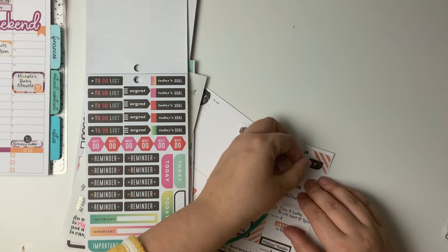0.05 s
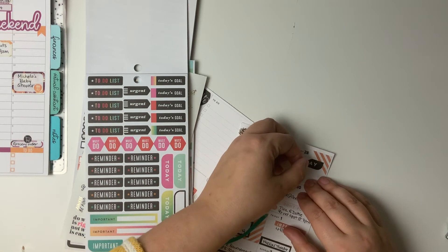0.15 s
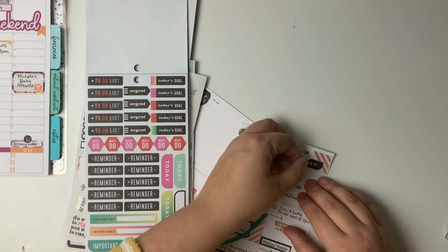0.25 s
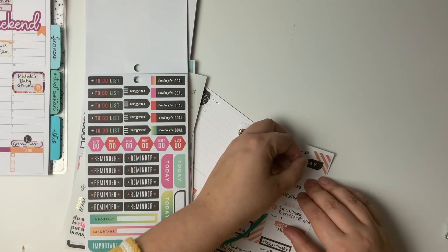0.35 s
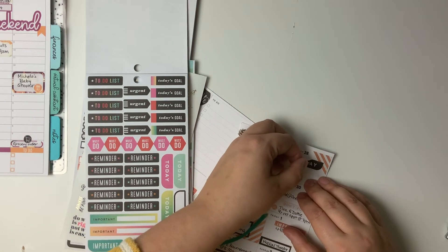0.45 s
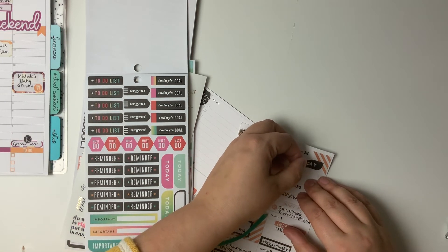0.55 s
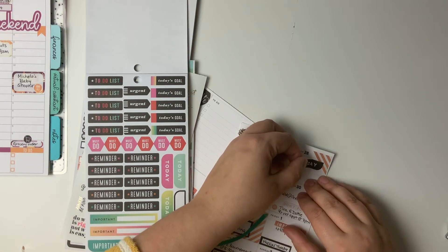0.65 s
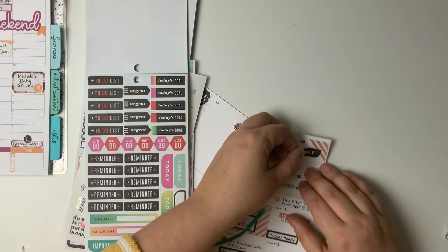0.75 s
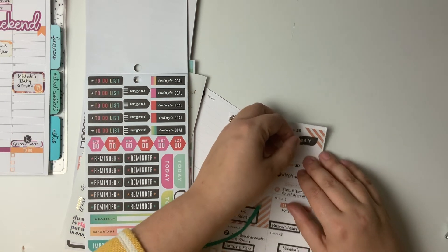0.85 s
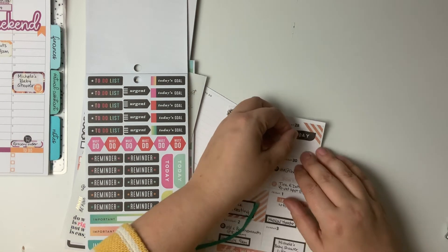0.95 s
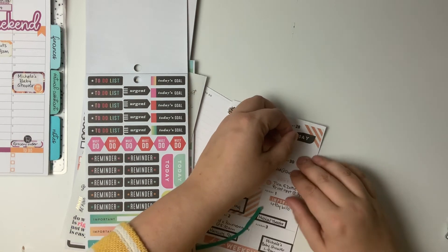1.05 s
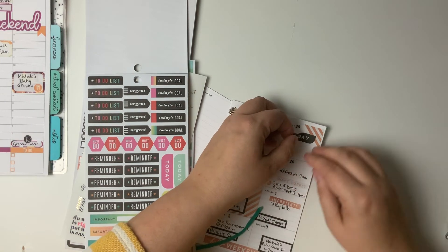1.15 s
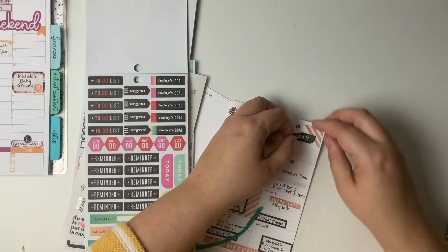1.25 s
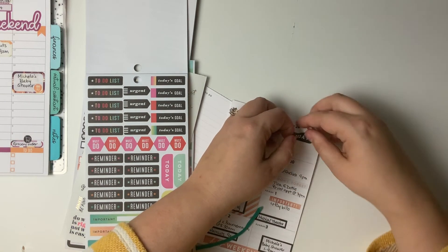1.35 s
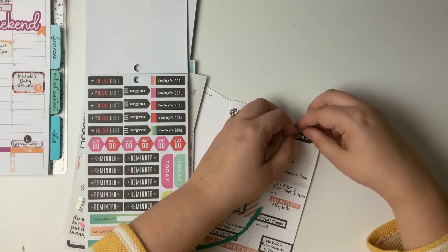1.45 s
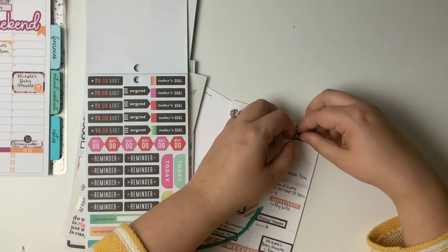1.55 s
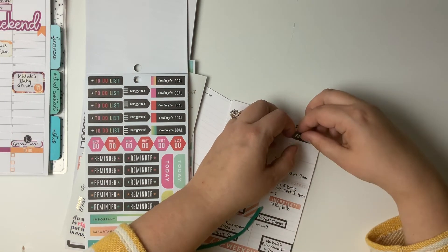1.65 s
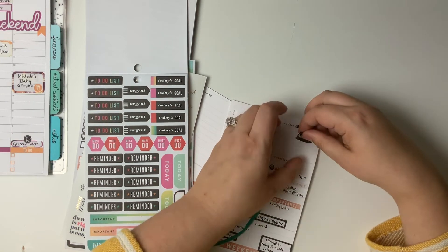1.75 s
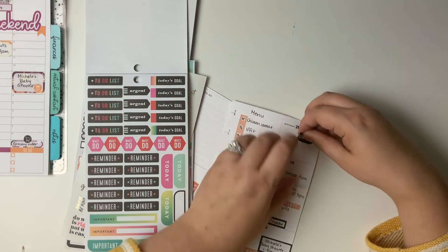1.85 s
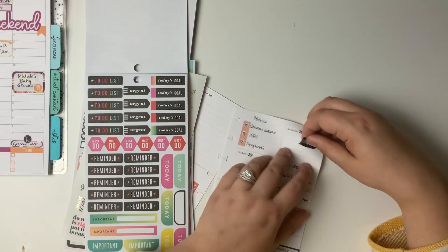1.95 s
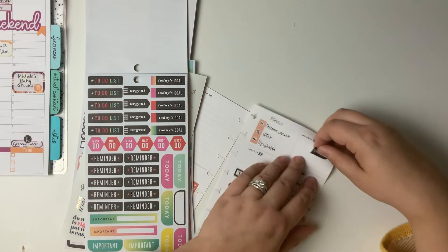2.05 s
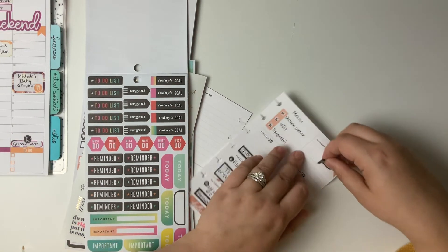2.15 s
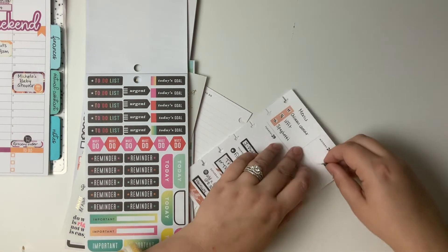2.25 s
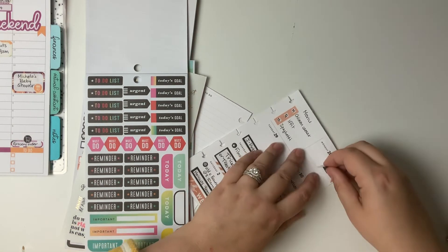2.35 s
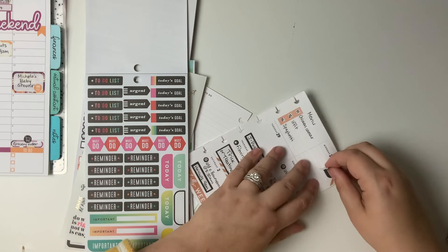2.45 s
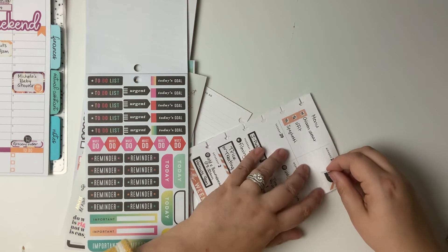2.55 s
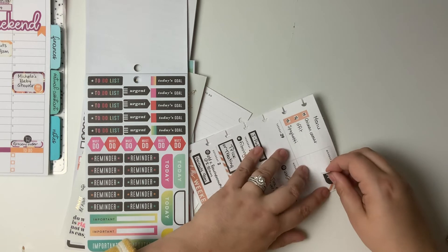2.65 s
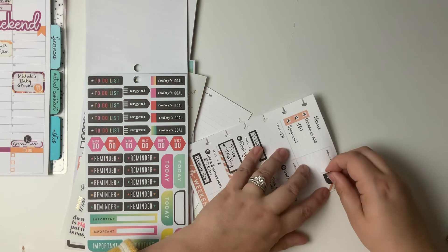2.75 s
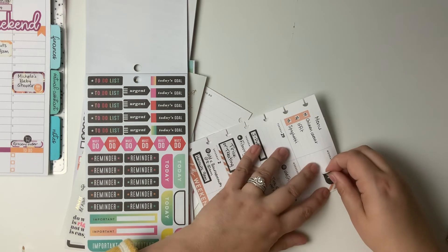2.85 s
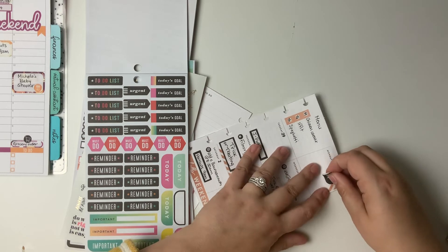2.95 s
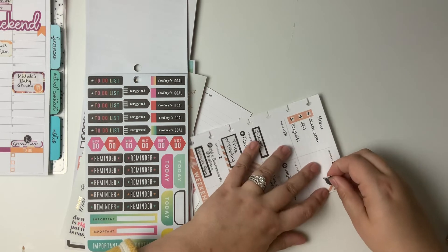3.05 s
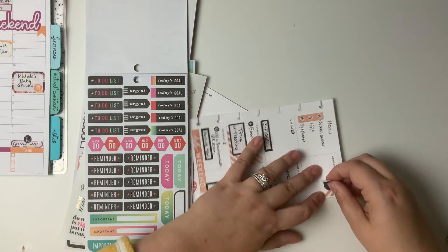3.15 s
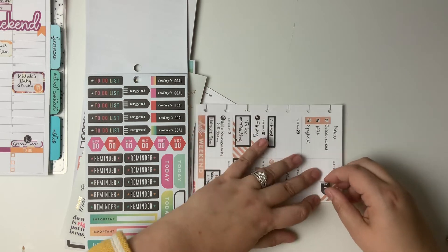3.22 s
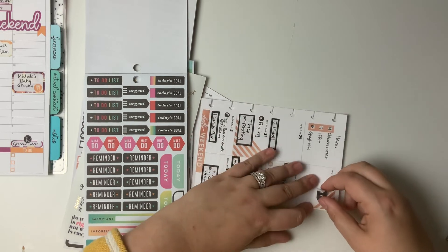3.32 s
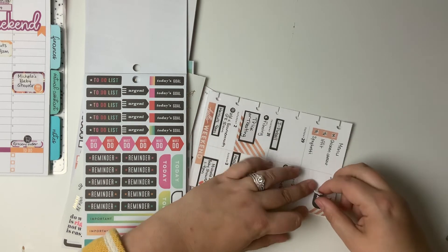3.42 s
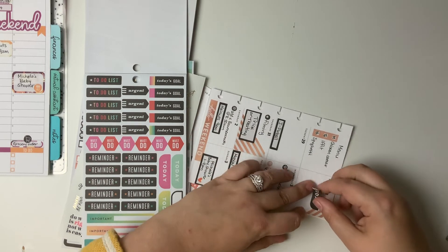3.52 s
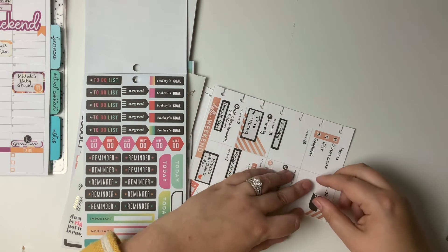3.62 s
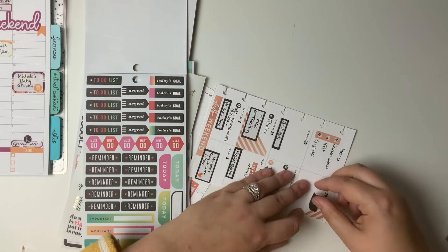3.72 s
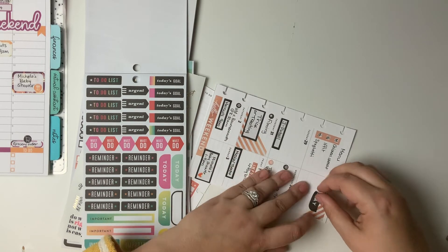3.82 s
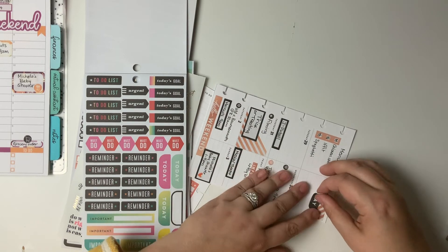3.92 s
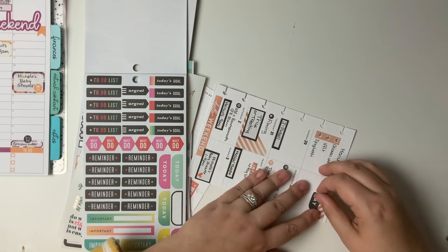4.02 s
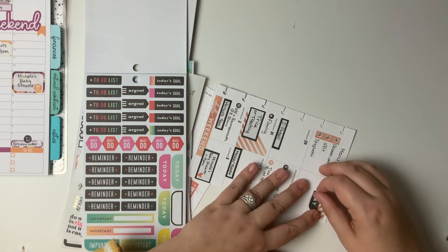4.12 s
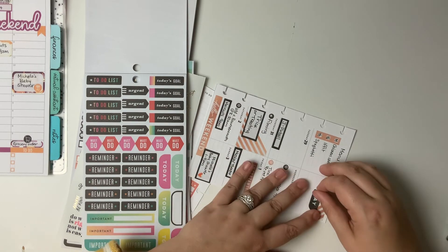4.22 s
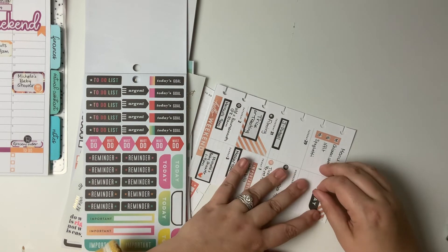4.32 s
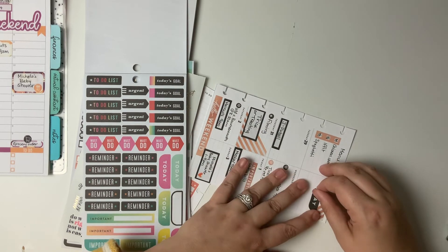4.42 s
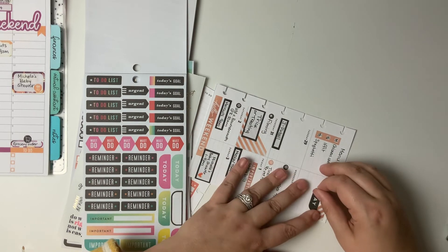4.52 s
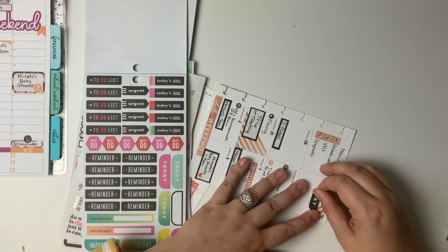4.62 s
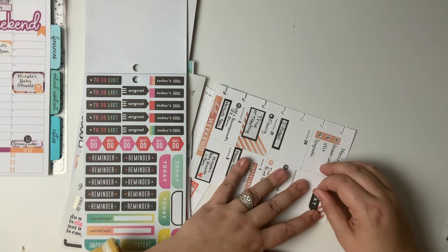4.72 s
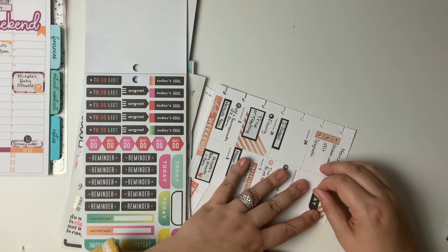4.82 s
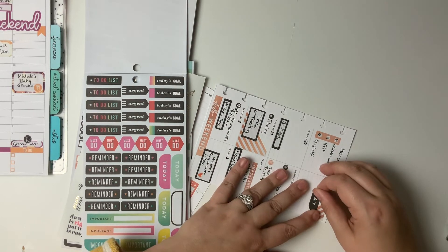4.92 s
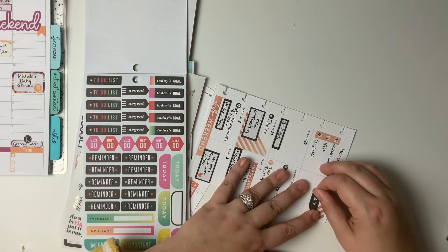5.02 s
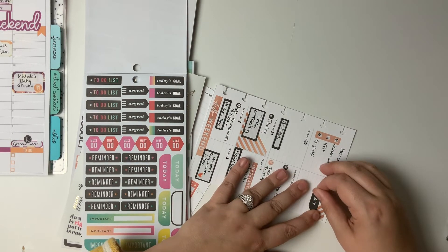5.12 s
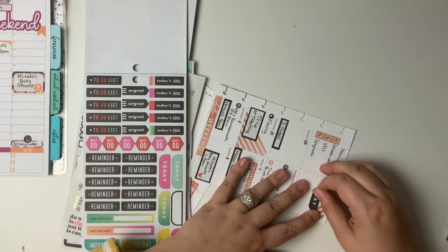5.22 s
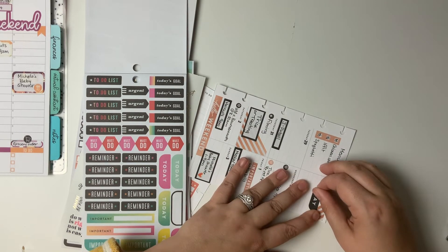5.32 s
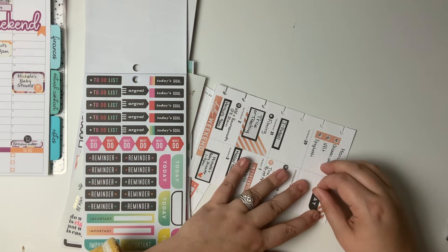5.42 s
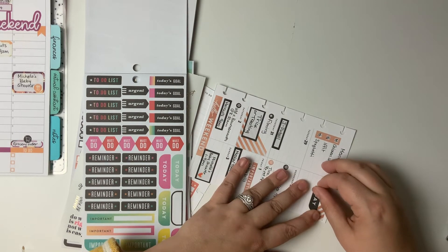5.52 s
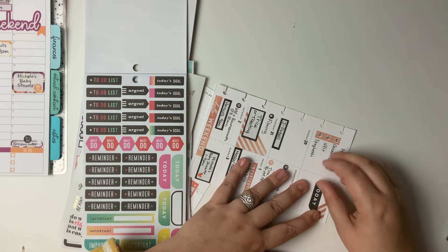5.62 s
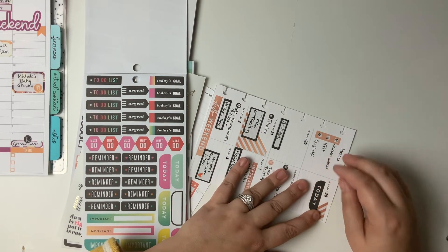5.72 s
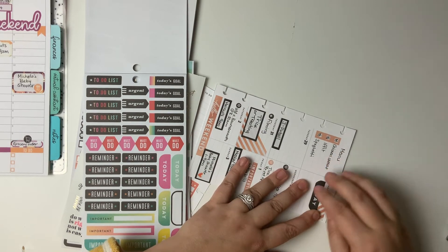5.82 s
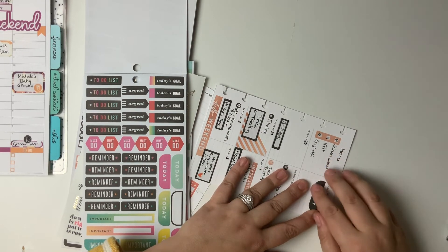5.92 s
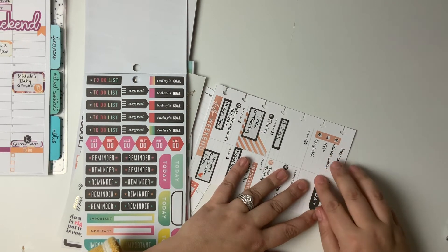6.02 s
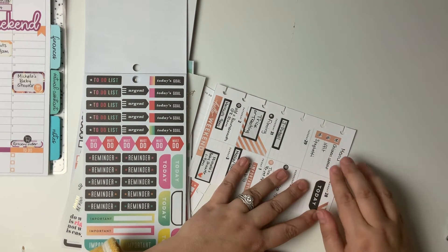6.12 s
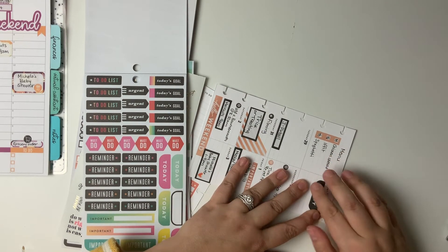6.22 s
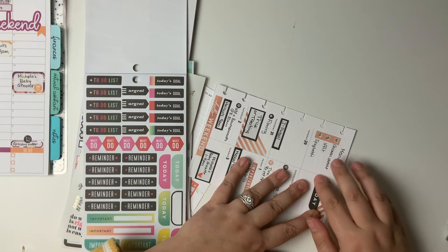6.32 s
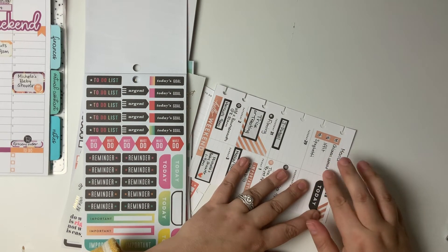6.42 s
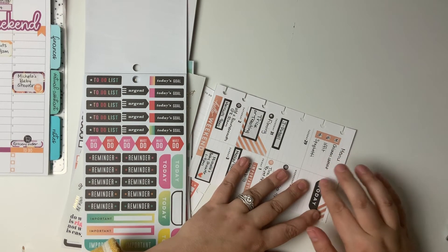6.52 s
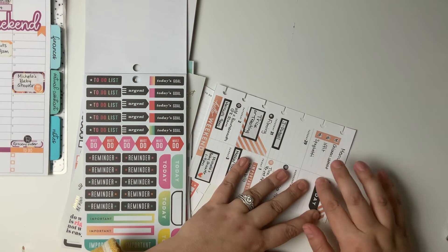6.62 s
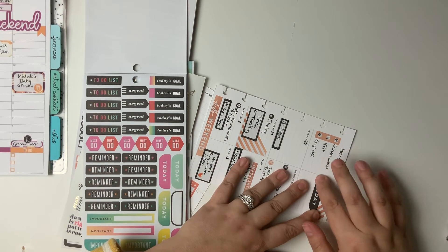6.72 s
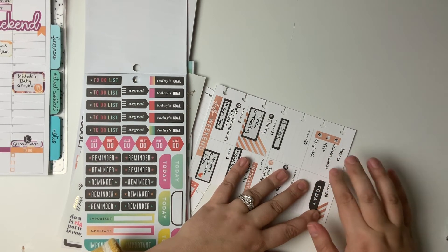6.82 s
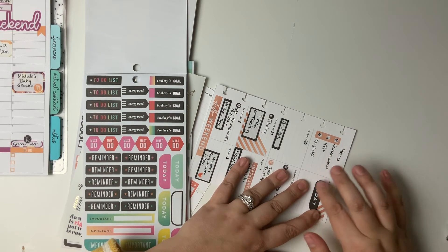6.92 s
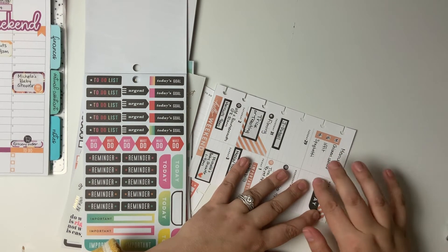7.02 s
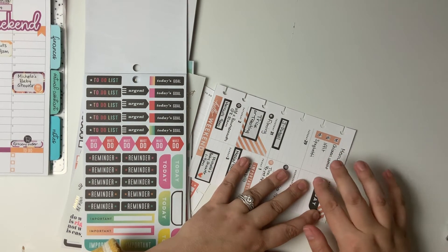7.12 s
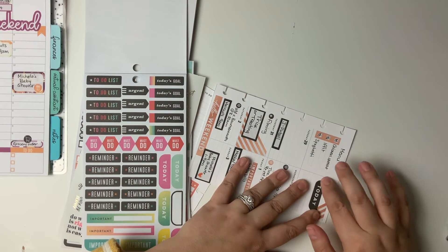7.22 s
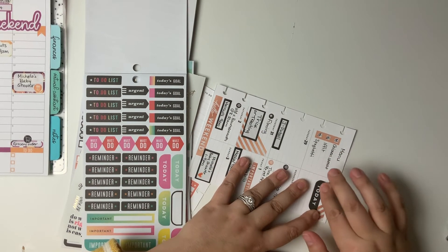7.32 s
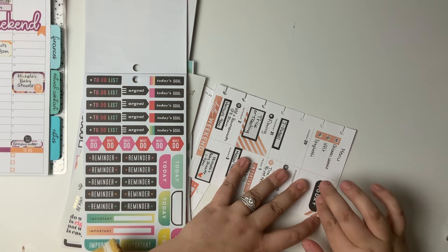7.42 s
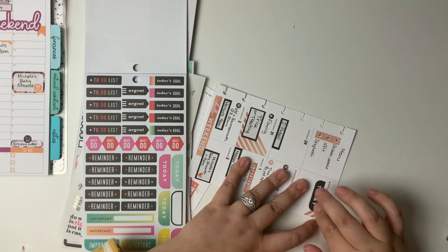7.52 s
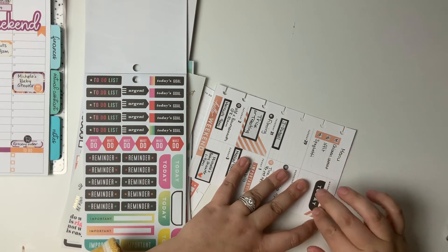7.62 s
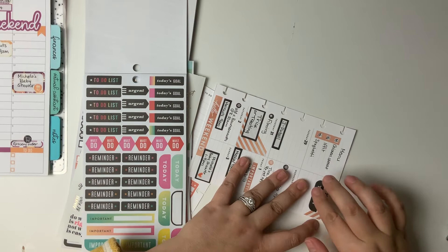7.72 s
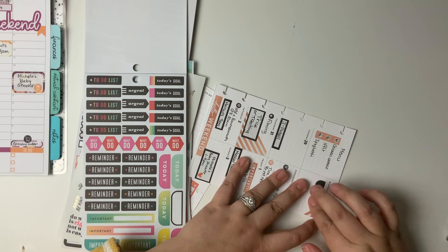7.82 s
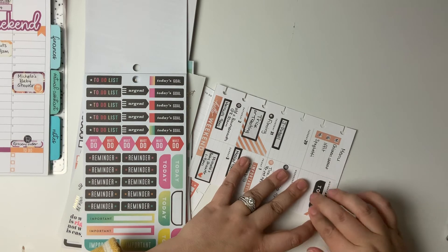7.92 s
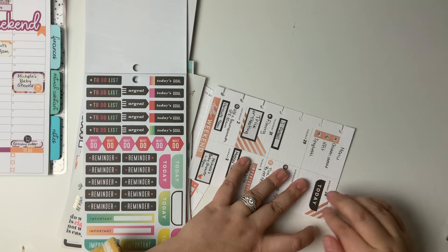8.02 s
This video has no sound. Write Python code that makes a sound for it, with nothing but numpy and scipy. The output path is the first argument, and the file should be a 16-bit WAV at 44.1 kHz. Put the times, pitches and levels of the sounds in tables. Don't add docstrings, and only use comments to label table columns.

```python
import sys
import numpy as np
from scipy import signal
from scipy.fft import rfft, irfft
from scipy.io import wavfile
from scipy.ndimage import uniform_filter1d

SR = 44100
rng = np.random.default_rng(int(sys.argv[2]) if len(sys.argv) > 2 else 0)


def to_wav(s):
    ch = np.atleast_2d(s).T
    pcm = np.round(np.clip(ch, -1, 1) * 32767)
    wavfile.write(sys.argv[1], SR, pcm.astype(np.int16))


def elevation(decibels):
    levels = np.asarray(decibels, float)
    return 10 ** (levels / 20)


N = 355446

# peak t/s, rise t/s, fall t/s, fizz level/dB, rasp re fizz level/dB
PEELS = [(.176, 0.14, 0.15, -71, 0), (.503, 0.13, 0.41, -61, -5), (.71, 0.0093, 1, -40.5, -3),
         (.745, 0.044, 0.11, -39.5, 0.5), (0.8, 0.078, 0.27, -35.5, -0.5), (1.05, 0.065, 0.02, -35, -16),
         (1.062, .012, .006, -28.5, -20), (1.088, .015, .025, -40, -13), (1.142, 0.03, 0.04, -39.5, -20),
         (1.22, 0.21, 0.29, -64.5, 2), (1.38, .03, 0.086, -49.5, -6), (1.41, 0.075, 0.14, -49.5, 2),
         (1.56, 0.041, 0.082, -51.5, 0), (1.748, 0.04, 0.055, -45.5, 1)]
# peak t/s, rise t/s, fall t/s, fizz level/dB, rasp re fizz level/dB
SLIDES = [(1.84, .1, 0.17, -44.5, -5.5), (1.92, 0.075, 0.34, -52.5, 10), (2.038, 0.12, 0.26, -30.5, 2.5),
          (2.19, 0.18, 0.15, -31, -5.5), (2.299, 0.075, 0.21, -34, -10.5), (2.45, 0.031, 0.19, -38.5, -8),
          (2.575, 0.18, 0.11, -38, -1.5), (2.68, 0.047, 0.061, -48, 0), (2.835, 0.062, 0.078, -41, -7.5),
          (2.984, 0.04, 0.31, -45.5, 3), (3.146, 0.11, 0.23, -34.5, -5.5), (3.324, 0.29, 0.22, -40, -2),
          (3.5, 0.27, 0.047, -44.5, -6.5), (3.581, 0.023, 0.08, -41.5, 0.5), (3.67, 0.29, 0.075, -46, -9.5),
          (3.77, 0.088, 0.12, -56, -11), (3.837, 0.035, 0.15, -46, -15), (3.925, 0.14, 0.027, -45, -14),
          (3.96, 0.033, 0.086, -60, -7), (4.13, 0.098, 0.097, -48.5, -23.5), (4.29, 0.072, 0.077, -50, -16),
          (2.75, .1, 0.25, -69, -1.5), (2.92, .06, 0.074, -61.5, -2)]
# peak t/s, rise t/s, fall t/s, fizz level/dB, rasp re fizz level/dB
SWEEPS = [(5.272, 0.049, 0.25, -64, -2), (5.489, 0.095, 0.042, -54.5, -7.5),
          (5.625, 0.081, 0.2, -37.5, -12), (5.82, .09, 0.21, -41, -31), (5.894, 0.19, 0.084, -49.5, 8.5),
          (6.24, 0.059, 0.12, -57, -5.5), (6.282, 0.014, 0.14, -53, -8), (6.6, 0.27, .1, -61, -8),
          (7.419, 0.042, 0.048, -35.5, -10.5), (7.561, 0.22, 0.14, -42.5, -9.5),
          (7.78, 0.017, 0.08, -54.5, -11), (8, 0.053, 0.04, -36.5, -15), (8.06, 0.012, .1, -30.5, -13.5)]
# start t/s, length t/s, fizz level/dB, rasp re fizz level/dB
RUBS = [(5.528, .06, -49, -17), (5.957, 0.073, -37, -14), (6.09, 0.041, -35, -17), (6.32, 0.13, -38, -17.5),
        (6.643, 0.046, -44.5, -8.5), (6.779, 0.044, -38, -19), (7.025, 0.04, -44, -15.5),
        (7.181, 0.034, -41, -14), (7.318, 0.09, -46.5, -11), (7.819, 0.16, -39, -14),
        (1.349, 0.074, -46.5, -9), (2.775, 0.034, -62, -1)]
FLUTTER_DB = [-16.5, -16, -6.5, -9]
HUM_DB = [-37, -13.5, -12, -2.5]
# t/s, fall t/s, page flutter level/dB, desk hum level/dB
PRESSES = [(.505, 0.094, -62, -51), (0.704, 0.13, -51, -45.5), (1.084, 0.15, -53, -44),
           (1.178, 0.32, -53, -49.5), (1.56, 0.14, -49, -35), (1.761, 0.09, -40, -39.5),
           (1.915, 0.98, -53, -45.5), (2.071, 0.11, -21.5, -19), (2.099, 0.091, -22.5, -33),
           (2.994, 0.1, -42, -38.5), (3.037, 0.036, -43, -44), (3.326, 0.13, -43.5, -39),
           (3.506, 0.048, -48, -39.5), (3.59, 0.21, -56, -43), (2.6, 0.25, -56, -47),
           (7.55, 0.15, -49.5, -43.5), (5.49, 0.057, -51, -32), (5.542, 0.24, -44.5, -32.5),
           (5.628, 0.093, -43.5, -45), (5.964, 0.15, -53, -34.5), (6.095, 0.19, -51, -37.5),
           (6.331, 0.19, -51, -32.5), (6.653, 0.15, -55, -25.5), (6.791, 0.1, -51.5, -29.5),
           (7.032, 0.098, -57, -25), (7.189, 0.098, -45, -38), (7.319, 0.2, -47, -37.5),
           (7.415, 0.16, -43, -35), (7.825, 0.49, -50.5, -43.5), (8.003, 0.012, -48, -34)]
# peak t/s, rise t/s, fall t/s, page flutter level/dB, desk hum level/dB
LEANS = [(6.685, .03, .03, -55, -26.5), (6.706, .015, 0.045, -56, -30.5), (7.078, .015, 0.058, -62, -30),
         (5.6, .03, 0.054, -46, -31.5), (6.035, 0.022, .035, -57, -36), (1.585, .02, .05, -46.5, -52),
         (3.025, .03, .04, -43, -41.5), (7.335, .02, .06, -54, -44), (5.7, .02, 0.024, -52, -42.5),
         (6.88, .03, 0.074, -67, -45.5), (2.062, .015, .03, -30, -23.5), (3.23, .02, .03, -50, -46),
         (7.41, 0.022, .02, -46, -40)]
# f/Hz, level per Hz/dB
FIZZ = [(3000, -26), (6000, -9), (8000, -3), (10000, 1.5), (12500, 5.5), (15000, 5), (17000, -14)]
# f/Hz, level per Hz/dB
GLOSS = [(5000, -68), (9000, -13), (12000, -6.5), (16000, -0.5)]
# f/Hz, level per Hz/dB
RASP = [(1200, -31.5), (2400, -10), (3500, -8), (4800, -4.5), (6200, -11), (8000, -12.5), (12000, -22)]
# f/Hz, level per Hz/dB
SKIN = [(1000, -45), (2000, -4), (3200, -7), (4500, -1), (6000, -7.5), (8000, -8.5), (12000, -15.5)]
# f/Hz, level per Hz/dB
FLUTTER = [(400, -26.5), (800, -12), (1200, -0.5), (1700, -4), (2300, -7.5), (3000, -7), (5000, -42)]
# start t/s, length t/s, f/Hz, level/dB
SQUEAKS = [(4.07, 0.089, 5200, -67.5), (4.185, 0.0036, 5240, -53), (3.8, 0.018, 6900, -60),
           (3.79, .04, 1400, -65), (2.8, 0.072, 3260, -54), (2.8, .03, 1400, -70), (7.69, 0.064, 8900, -66),
           (1.385, 0.11, 4970, -49.5), (7.82, 0.13, 2180, -50), (1.9, 0.11, 3400, -39.5),
           (1.754, .004, 3050, -33), (1.74, .012, 2000, -42), (1.77, 0.036, 3300, -50.5),
           (3.11, .06, 2700, -52), (8, .07, 4300, -62)]
# t/s, peak level/dB, middle re peak level/dB, low re peak level/dB
SNAPS = [(0.17, -41.5, -3, -4), (0.499, -32, 10, -37), (0.6972, -24.5, 7, -14), (1.0575, -22, -16, -22),
         (1.5556, -21, -1, -15), (1.739, -18.5, 0, -25), (1.7445, -20, 0, -22.5), (1.754, -9, 2, 0),
         (2.0671, -11.5, -22, 16), (2.112, -17, -10, -9), (2.118, -13, 0, -8), (3.327, -25.5, -5, 7),
         (3.5045, -44, -17, 10), (3.575, -15.5, -24, -32), (3.582, -26.5, -25.5, -24),
         (4.1854, -34.5, -15.5, -29), (5.271, -41, -1, -2.5), (5.4855, -30.5, -8.5, -10.5),
         (5.5374, -28, -1, 3), (5.6276, -11, -19, -22), (5.895, -24.5, -25, -7), (6.276, -25, -18, -19.5),
         (6.5852, -37, -26, -29.5), (6.986, -37, -34, -24.5), (7.419, -24.5, -13.5, 4),
         (2.971, -35, -3, -7.5), (1.732, -33.5, 0, -19.5), (7.315, -35.5, 2, 0), (1.085, -34.5, -7, -5)]
# t/s, peak level/dB, middle re peak level/dB, low re peak level/dB
FLICKS = [
    (2.07, -6.5, 0, -25),
    (2.0784, -1.5, -29.5, -1.5),
    (2.6636, -21, -7, -22),
    (3.578, -8.5, -21.5, -29),
    (6.784, -41, -27, 13),
    (7.777, -30.5, -28, -31),
]
# t/s, peak level/dB, middle re peak level/dB, low re
# peak level/dB
MORE_FLICKS = [(1.138, -36, -12, -26), (1.7241, -37, -12, -23), (1.7482, -23.5, -5, -30), (1.945, -21, 0.5, -15),
               (2.0586, -16.5, 3, 6.5), (2.338, -24, -17, -30), (2.698, -31, 1, -10.5), (2.948, -45, -5, 10),
               (3.5444, -25.5, -21, -25), (3.93, -37.5, -4, -1), (5.316, -44, -6, -8.5), (5.563, -44, -4, -10),
               (6.088, -32, -10, 3), (7.1824, -35, -3, 10), (7.525, -41, -3, -8), (7.818, -43, -4, -4),
               (8.052, -37, -10, -15), (1.9984, -21, -5.5, -20.5), (2.4432, -26.5, -8, -25),
               (2.7976, -37, -3, -23), (3.0829, -28, -8, -25), (3.1433, -26, -7.5, -25), (1.3678, -36, -7, -24),
               (3.026, -34, 0, 2), (3.506, -40.5, 2.5, 3), (5.897, -38, -2, 4), (6.644, -39, -4, 7),
               (6.78, -34, -1.5, 8), (7.023, -41, -6, 10), (2.972, -29.5, 3, 0), (3.5765, -14, -6, -18),
               (7.42, -32, -2, -2), (5.957, -38, 0, 8)]
# t/s, peak level/dB, thud re peak level/dB, boom re peak level/dB, knock re peak level/dB
TAPS = [(5.487, -33.5, -6, -2.5, -26), (5.539, -30.5, -7.5, -8, -25), (5.585, -41, -4, 13, -7),
        (5.627, -31.5, -12, 3, -21), (5.908, -40.5, 2.5, -1, -3), (5.956, -27, -12.5, -7.5, -21),
        (6.088, -23, -15, -7, -6.5), (6.28, -47.5, 14.5, 14, -17), (6.325, -23, -23, -11, -17),
        (6.644, -19.5, -20, -13.5, -26.5), (6.7, -26.5, -22, -24, -34), (6.781, -19.5, -22, -13.5, -8.5),
        (6.993, -56, 10, 9.5, -14), (7.023, -21.5, -18, -11.5, -20), (7.075, -33, -31, -17, -19),
        (7.182, -31, -29, -14, -11), (7.317, -37, -15, -26, -9), (7.418, -32.5, -9, -12, -18),
        (7.551, -55, 6, 15, -15.5), (7.778, -57, 17, 6, -6.5)]
# t/s, peak level/dB, boom re peak level/dB, knock re peak level/dB
DROPS = [(0.699, -35.5, -1.5, -17), (1.556, -40, -9, -24), (1.603, -37.5, 6, -5), (2.054, -26.5, -4, 2),
         (2.076, -20, 1, 2), (2.087, -25, -10, -6.5), (2.992, -42, -4, -11), (3.009, -40, -5, -11),
         (3.025, -35.5, -9, -4), (3.04, -46, 3, -6), (3.323, -33.5, -7.5, -5)]
# f/Hz, level/dB, time to die by 60 dB t/s
DESK = [(308.2, -4.5, 0.056), (444.7, -4, 0.11), (519.7, -5, 0.072), (587, -6, 0.07), (682, -7, 0.058),
        (725.6, -5.5, 0.085), (850, -14, 0.03), (966, -17, 0.022)]
# f/Hz, level/dB, time to die by 60 dB t/s
KNOCK = [(1099, 1, 0.038), (1182, -1, 0.024), (1284, 1.5, 0.04), (1340, 2, 0.034), (1676, -2.5, 0.03),
         (1830, -5, 0.02), (2160, -3, 0.018), (2280, -6.5, 0.02)]
# f/Hz, level/dB, time to die by 60 dB t/s
BOOM = [(125.8, -6, 0.25), (167.8, 8.5, 0.073), (256, -1.5, 0.052)]
# f/Hz, level/dB, time to die by 60 dB t/s
HOLLOW = [(209, -20, .2), (443.6, 0, 0.28), (571, -16, .25), (743, -6.5, .28), (868, -12, .22),
          (1084, -8.5, .3), (1184, -9, .3), (1250, -9, .32), (1692, -10.5, .22), (1876, -16, .22),
          (2140, -18.5, .2), (2316, -18, .2)]
# t/s, peak level/dB
BLOWS = [
    (2.048, -33.5),
    (2.059, -21),
    (2.072, -16.5),
    (2.078, -12.5),
    (2.088, -17.5),
    (2.105, -21),
    (2.122, -20),
    (2.139, -25.5),
]
# f/Hz, level per Hz/dB
AIR = [(12, -50), (20, -8), (43, 0), (138, 3), (204, -12), (293, -12), (410, -19), (446, -6.5),
       (485, -35.5), (527, -29), (738, -33.5), (2200, -37.5), (16000, -39.5)]
# f/Hz, width f/Hz, level/dB
ROOM_HUM = [(128.5, 6.9, -54), (150, 9.7, -63), (278.7, 27, -59.5), (449.4, 14, -66)]
# f/Hz, time to die by 60 dB t/s
ROOM = [(125, 0.5), (500, 0.18), (2000, 0.055), (8000, 0.2), (16000, 0.11)]
# f/Hz, phase/radians
LEAD = [(0, 0), (200, -.6), (520, 0), (1210, 1.5), (1460, 3.6), (2840, 9.5), (3900, 15.7), (4650, 19.4),
        (5510, 24.6), (6290, 28), (7580, 34.8), (9220, 37.5), (12350, 43.98), (15250, 50.27)]
# f/Hz, likeness (0 to 1)
SAME = [(50, .97), (125, .93), (300, .82), (650, .4), (1500, .55), (2800, .6), (4500, .48), (8500, .3),
        (9400, .75), (10600, .86), (16000, .86)]
# f/Hz, level difference/dB
TILT = [(60, -1), (380, -4.5), (1200, -0.4), (3200, -1.5), (5000, 4), (6800, -2), (8800, 5), (11000, 1)]
# f/Hz, level/dB
JOINT = [(1500, -5.5), (2500, -4.5), (8500, -4.5), (10000, -6.5)]

GLOSS_FROM_S = 5.14
RUB_RISE_S, RUB_SAG_DB_PER_S, RUB_LIFT_S = 0.003, 59, 0.044
FLUTTER_PER_RASP = 0.76
RISE_BEND, FALL_BEND, PRESS_BEND = 0.96, 1.71, 5.36
PRESS_RISE_S, PRESS_STRETCH = .007, 2.4
SQUEAK_WIDTH_HZ = 600
CREASE_S, FLICK_S = .0052, .002
DROP_THUD_DB = -60
POP_HZ, POP_S, POP_DB = 640, .001, -1
SMACK_S, SMACK_HZ, SMACK_DB = 2.0769, 952, -8.5
AIR_DB = -48.5
HISS_ALIKE = .3
EDGE_HZ = 15750
JOINT_FROM_HZ, JOINT_QUIET_DB = 1500, -89


def evened(x):
    return x / np.sqrt(np.mean(x ** 2) + 1e-20)


def peaked(x):
    return x / abs(x).max()


def read(points, hz):
    f, value = np.transpose(points)
    return np.interp(np.log(hz + 1), np.log(f + 1), value)


def colour(x, points):
    size = x.shape[-1]
    gain = elevation(read(points, np.fft.rfftfreq(size, 1 / SR)))
    return evened(irfft(rfft(x) * gain, size))


def add(mix, s, sound):
    part = mix[..., round(s * SR):][..., :sound.shape[-1]]
    part += sound[..., :part.shape[-1]]


def ring(modes, shorter=0.87, spot_db=0):
    t = np.arange(SR // 4) / SR
    hz, db, t60 = np.transpose(modes)[..., None]
    opposite = np.pi * np.arange(len(hz))[:, None]
    decay = elevation(db + spot_db - 60 * t / (t60 * shorter))
    return (decay * np.sin(2 * np.pi * hz * t + opposite)).sum(0)[None]


def swell(peak, rise, fall, db, hold=0, sag_db=0, bend=FALL_BEND):
    u = np.arange(0, N, 32) / SR - peak
    up = np.clip(1 + u / max(rise, .002), 0, 1)
    down = np.clip(1 - (u - hold) / max(fall, .002), 0, 1)
    level = elevation(db - sag_db * np.clip(u, 0, hold))
    return (level * up ** RISE_BEND * down ** bend) ** 2


def gestures():
    rubs = [(s, RUB_RISE_S, RUB_LIFT_S, db, rasp_db, length, RUB_SAG_DB_PER_S)
            for s, length, db, rasp_db in RUBS]
    power = 0
    for rows, flutter_db, hum_db in zip((PEELS, SLIDES, SWEEPS, rubs), FLUTTER_DB, HUM_DB):
        for s, rise, fall, db, rasp_db, *hold in rows:
            shake_db = FLUTTER_PER_RASP * rasp_db
            share = elevation(np.array([0, rasp_db, flutter_db + shake_db, hum_db + shake_db]))[:, None]
            power = power + share ** 2 * swell(s, rise, fall, db, *hold)
    for s, fall, flutter_db, hum_db in PRESSES:
        share = np.array([0, 0, elevation(flutter_db), elevation(hum_db)])[:, None]
        power = power + share ** 2 * swell(s, PRESS_RISE_S, PRESS_STRETCH * fall, 0, bend=PRESS_BEND)
    for s, rise, fall, flutter_db, hum_db in LEANS:
        share = np.array([0, 0, elevation(flutter_db), elevation(hum_db)])[:, None]
        power = power + share ** 2 * swell(s, rise, fall, 0)
    return np.sqrt(power).repeat(32, axis=1)[:, :N]


def friction(patchy_db, grain_db, flicker_db):
    slips = rng.standard_normal((2, N)) * elevation(grain_db * np.minimum(rng.exponential(1, N), 5))
    z = signal.stft(slips, nperseg=256, noverlap=192)[2]
    streaks = uniform_filter1d(rng.standard_normal(z.shape[1:]), size=3, axis=0)
    streaks = evened(uniform_filter1d(streaks, size=60, axis=1))
    flicker = evened(uniform_filter1d(rng.standard_normal(z.shape[2]), size=5))
    shifting = elevation(patchy_db * streaks + flicker_db * flicker)
    return signal.istft(z * shifting, nperseg=256, noverlap=192)[1][:, :N]


def strokes():
    on_paper = np.arange(N) / SR < GLOSS_FROM_S
    gains = gestures()
    rub = friction(patchy_db=3.0, grain_db=2.0, flicker_db=1.28)
    drag = friction(patchy_db=3.0, grain_db=3.0, flicker_db=0.0)
    wood = ring(DESK, shorter=0.86) + elevation(-14.0) * ring(KNOCK, shorter=1.1)
    hum = evened(signal.oaconvolve(drag, wood, axes=1)[:, :N])
    hum = signal.lfilter(*signal.butter(2, 150, "high", fs=SR), hum)
    fizz = np.where(on_paper, colour(rub, FIZZ), colour(rub, GLOSS))
    rasp = np.where(on_paper, colour(rub, RASP), colour(rub, SKIN))
    flutter = colour(drag, FLUTTER)
    layers = [elevation(-0.6) * fizz, elevation(-1.5) * rasp, elevation(-1.0) * flutter, elevation(-7.0) * hum]
    return sum(gain * layer for gain, layer in zip(gains, layers))


def squeaks():
    out = np.zeros((2, N))
    for s, length, hz, db in SQUEAKS:
        slips = rng.standard_normal((2, SR // 2))
        band = evened(signal.lfilter(*signal.iirpeak(hz, hz / SQUEAK_WIDTH_HZ, SR), slips))
        power = swell(.1, RUB_RISE_S, RUB_LIFT_S, db, hold=length)
        add(out, s - .1, band * np.sqrt(power).repeat(32)[:SR // 2])
    return out


def snaps(rows, length_s):
    out, t = np.zeros((2, N)), np.arange(2048) / SR
    bursts = elevation(7.14 * rng.exponential(1, (len(rows), 1, 2048)).clip(0, 4))
    cracks = rng.standard_normal((len(rows), 2, 2048)) * bursts
    fade = np.minimum(t / .0004, 1) * np.exp(-t / length_s)
    for (s, db, middle_db, low_db), crack in zip(rows, cracks):
        tone = colour(crack, FIZZ)
        tone = tone + elevation(middle_db) * colour(crack, RASP) + elevation(low_db) * colour(crack, FLUTTER)
        add(out, s, elevation(db + 5.0) * peaked(tone * fade))
    return out


def pulse(hz):
    late = np.arange(SR // 4) / SR - 2.4 * POP_S
    return np.cos(2 * np.pi * hz * late) * np.exp(-(late / POP_S) ** 2)


def taps():
    out, t = np.zeros((2, N)), np.arange(SR // 4) / SR
    rows = [(s, db, DROP_THUD_DB - db, *rest) for s, db, *rest in DROPS] + TAPS
    chance = rng.standard_normal((len(rows), 2, 320))
    thud = np.sin(2 * np.pi * 55 * t) * np.exp(-t / 0.022) * np.minimum(t / 0.0027, 1)
    for (s, db, thud_db, boom_db, knock_db), uneven in zip(rows, chance):
        contact = (0.5 + uneven[:, :300]) * np.exp(-np.arange(300) / 22)
        spot_db = 2.3 * uneven[0, 300:, None]
        rings = (ring(m, shorter=0.886, spot_db=spot_db[:len(m)]) for m in (DESK, BOOM, KNOCK))
        body, boom, knock = (peaked(signal.oaconvolve(r, contact, axes=1)[:, :len(t)]) for r in rings)
        wood = body + elevation(boom_db + 2.0) * boom + elevation(knock_db) * knock
        wood = signal.lfilter(*signal.butter(2, 100, "high", fs=SR), wood)
        sound = wood + elevation(thud_db + 9.0) * thud + elevation(POP_DB) * pulse(POP_HZ)
        add(out, s, elevation(db - 1.0) * sound)
    add(out, SMACK_S, elevation(SMACK_DB) * pulse(SMACK_HZ)[None])
    return out


def hollow():
    out = np.zeros((2, N))
    chance = rng.standard_normal((len(BLOWS), 2, 80))
    for (s, db), uneven in zip(BLOWS, chance):
        near, far = (.8 + uneven[:, :60]) * np.hanning(60)
        contact = np.array([np.pad(near, (0, 28)), np.pad(far, (28, 0))])
        modes = ring(HOLLOW, shorter=.52, spot_db=3.0 * uneven[0, 60:60 + len(HOLLOW), None])
        add(out, s, elevation(db) * peaked(signal.oaconvolve(modes, contact, axes=1)))
    return out


def sparse_tail():
    clicks = np.zeros((2, SR // 2))
    at = np.arange(200, SR // 2 - 12, 12)
    at = at + rng.integers(0, 12, (2, len(at)))
    np.put_along_axis(clicks, at, rng.choice([-1., 1.], at.shape), 1)
    hz, t, z = signal.stft(clicks, SR, nperseg=256)
    decay = elevation(-60 * t / read(ROOM, hz)[:, None])
    tail = signal.istft(z * decay, SR, nperseg=256)[1]
    return tail / np.linalg.norm(tail, axis=1, keepdims=True)


def air():
    t = np.arange(N) / SR
    waves = (np.sin(2 * np.pi * (f * t + rng.random())) / np.sqrt(f) for f in np.geomspace(.2, 6, 16))
    drift = evened(sum(waves))
    out = elevation(AIR_DB) * colour(rng.standard_normal((2, N)), AIR)
    for hz, width, db in ROOM_HUM:
        noise = rng.standard_normal((2, N))
        out += elevation(db) * evened(signal.lfilter(*signal.iirpeak(hz, hz / width, SR), noise))
    return out * elevation(1.1 * drift)


def ports(x, treble_alike=1):
    hz = np.fft.rfftfreq(N, 1 / SR)
    direct, scattered = rfft(x)
    same = read(SAME, hz) * np.where(hz > 700, treble_alike, 1)
    delay = np.exp(-1j * np.interp(hz, *np.transpose(LEAD)))
    right = same * delay * direct + np.sqrt(1 - same ** 2) * scattered
    tilt = elevation(read(TILT, hz) / 2)
    return irfft(np.array([direct * tilt, right / tilt]), N)


def scene():
    hands = strokes() + squeaks()
    hands += snaps(SNAPS, CREASE_S) + snaps(FLICKS, FLICK_S) + snaps(MORE_FLICKS, FLICK_S)
    hands += taps() + hollow()
    echo = signal.fftconvolve(hands, sparse_tail(), axes=1)[:, :N]
    return ports(hands + elevation(-9.0) * echo) + ports(air(), HISS_ALIKE)


def joint(x):
    hz, _, z = signal.stft(np.array([x[0] + x[1], x[0] - x[1]]) / 2, SR, nperseg=1024)
    power = uniform_filter1d(uniform_filter1d(abs(z) ** 2, size=4, axis=1), size=5, axis=2)
    other = power[::-1]
    weak = power < elevation(2 * read(JOINT, hz))[:, None] * other
    weak = weak & (hz > JOINT_FROM_HZ)[:, None] & (other > elevation(2 * JOINT_QUIET_DB))
    mid, side = signal.istft(z * ~weak, nperseg=1024)[1][:, :N]
    return np.array([mid + side, mid - side])


def band_limit(x):
    return signal.sosfilt(signal.butter(12, 16870, fs=SR, output="sos"), x)


def record(dry):
    low_pass = signal.firwin(767, EDGE_HZ, window=("kaiser", 8), fs=SR)[None]
    limited = signal.oaconvolve(np.clip(dry, -.96, .96), low_pass, "same")
    mix = np.clip(joint(limited), -1, 1)
    return band_limit(mix)


dry = scene()
out = record(dry)
to_wav(out)
```